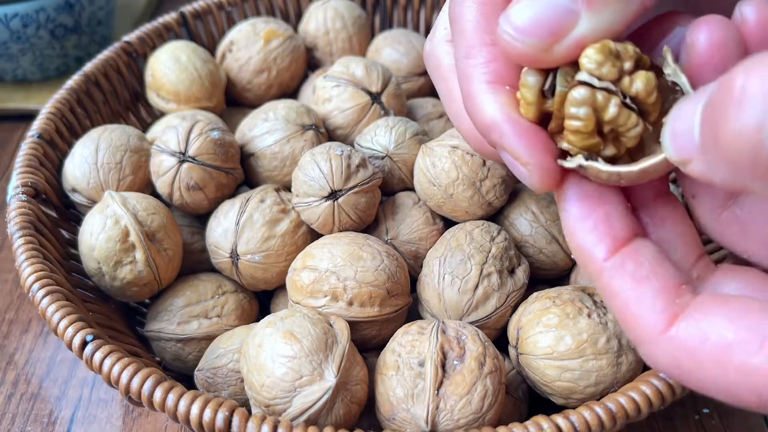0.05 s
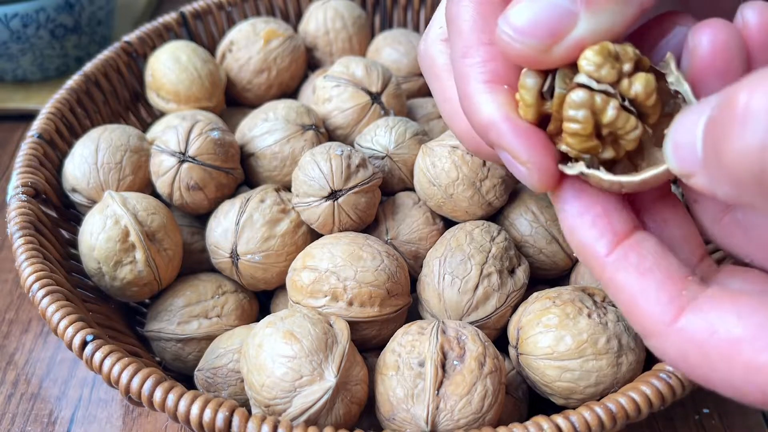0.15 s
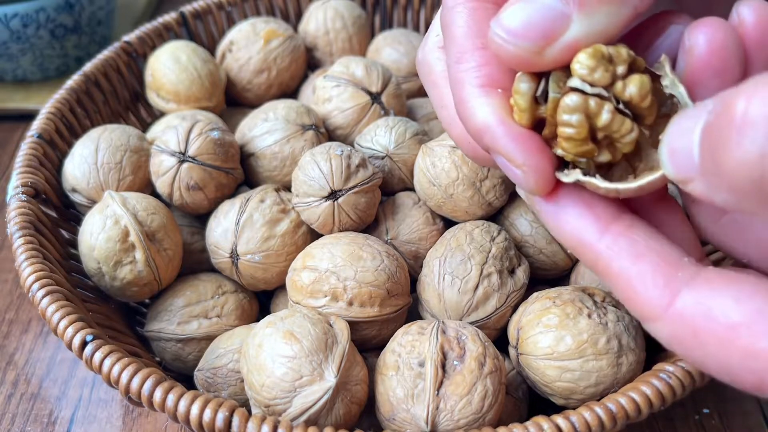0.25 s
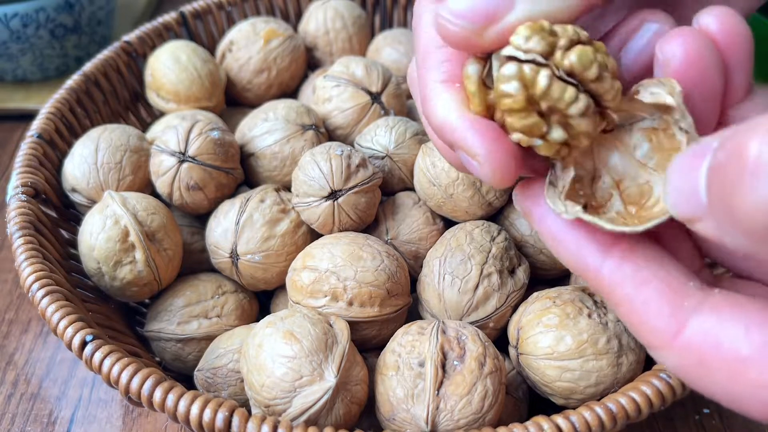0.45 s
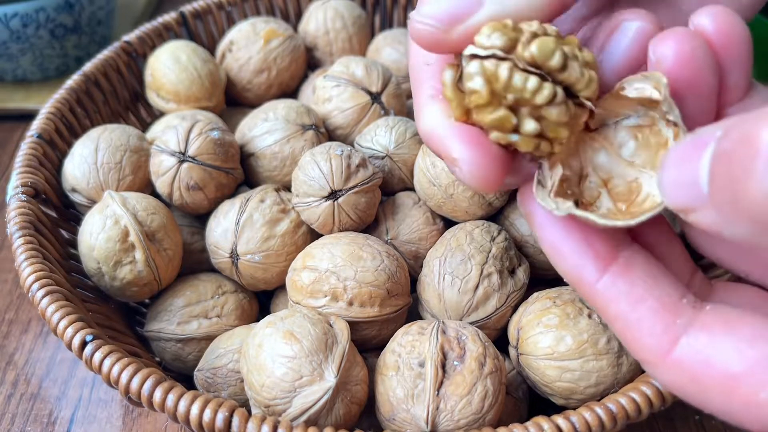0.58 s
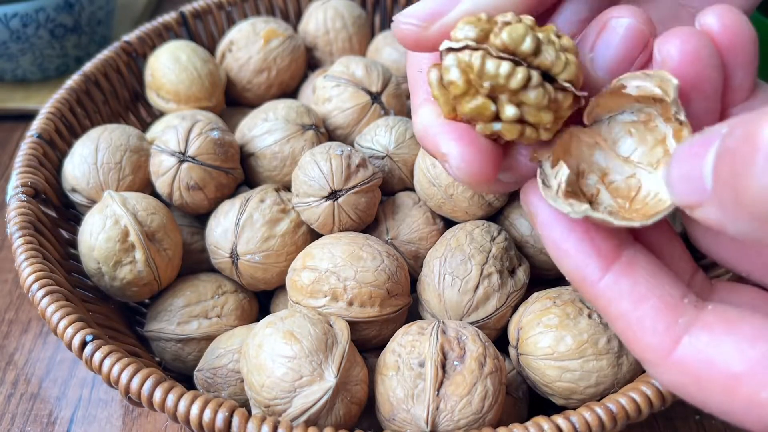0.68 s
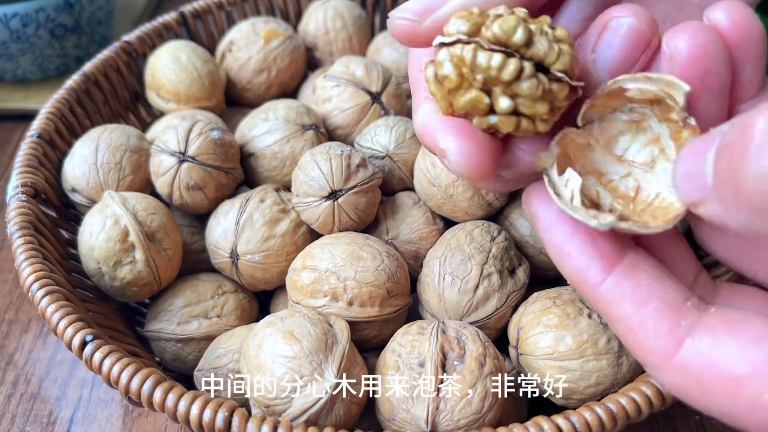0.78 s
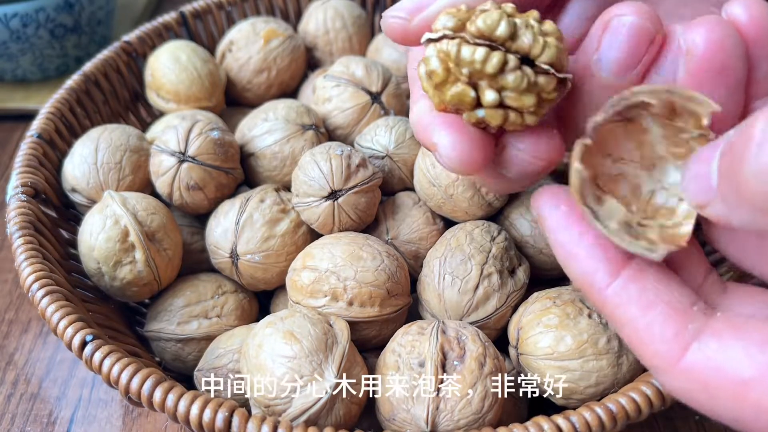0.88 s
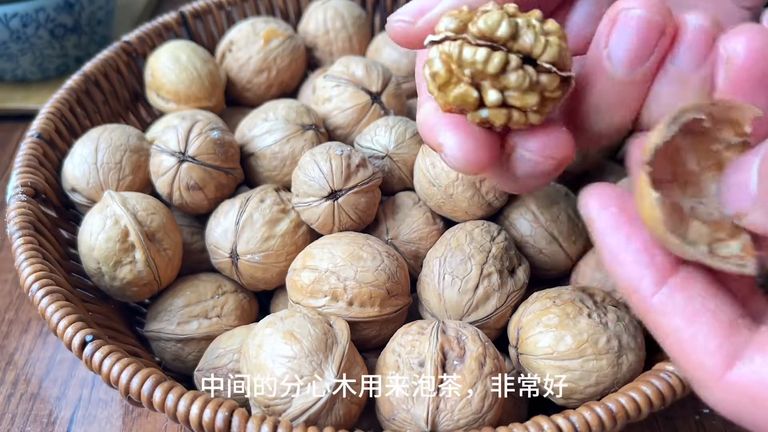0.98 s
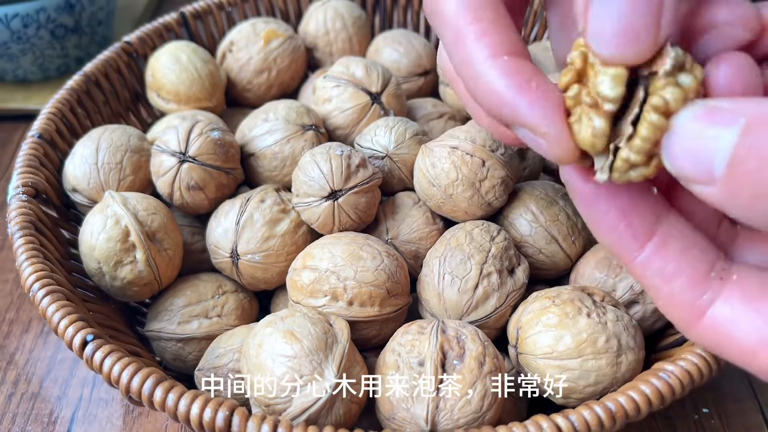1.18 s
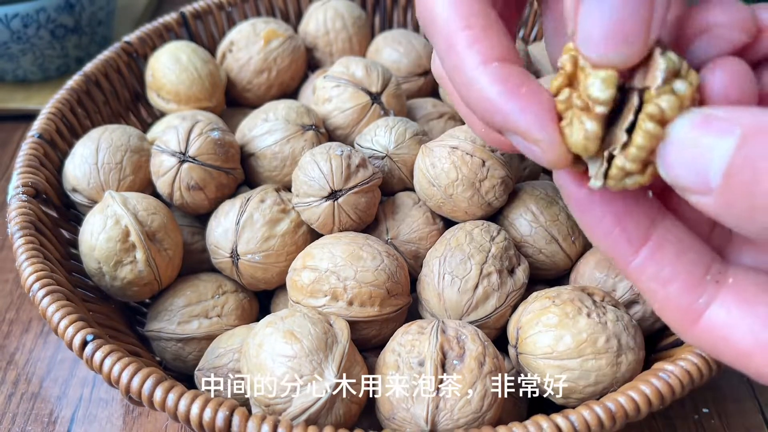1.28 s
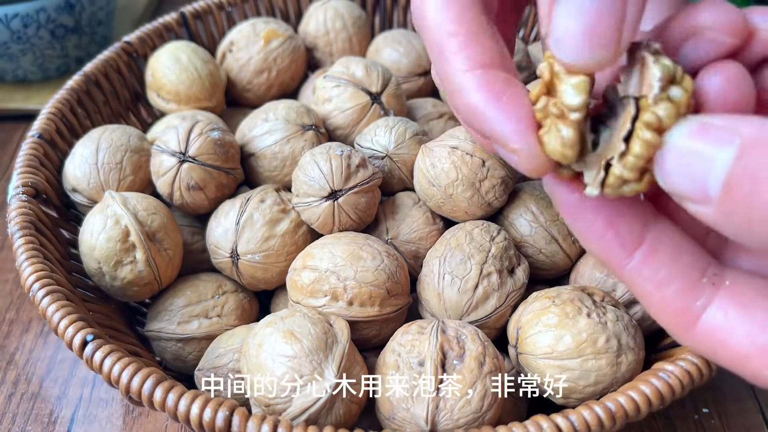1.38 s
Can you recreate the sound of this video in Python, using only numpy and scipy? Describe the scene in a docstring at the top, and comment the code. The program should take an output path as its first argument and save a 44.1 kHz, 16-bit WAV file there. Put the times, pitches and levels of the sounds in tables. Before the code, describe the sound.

A walnut shell cracks sharply as it is pulled apart by hand, with small clicks.

```python
"""A kitchen, phone microphone close to a walnut being prised apart by hand. The seam ticks and creaks, then
gives at 0.22 s with one sharp crack and a second snap. Each break rings the hollow shell; the table and the
room answer. A fingertip slides along the shell, and loose pieces tick against it until 1.1 s. The low room
noise and appliance hum behind them dip near 1.2 s, and a thin, distant whirr comes forward."""
import sys
import numpy as np
from scipy import signal
from scipy.fft import rfft, irfft, next_fast_len
from scipy.io import wavfile
from scipy.ndimage import uniform_filter1d

SR = 44100
rng = np.random.default_rng(int(sys.argv[2]) if len(sys.argv) > 2 else 0)


def master_out(mix):
    """Clip the mix to full scale and print it as 16-bit PCM to the path in sys.argv[1]."""
    frames = np.transpose(np.atleast_2d(mix))
    ceiling = np.clip(frames, -1, 1)
    pcm = np.round(ceiling * 32767).astype(np.int16)
    wavfile.write(sys.argv[1], SR, pcm)


N = 63945

# breaks (peak time [s], level [dB], length [ms], treble tilt [dB/octave], pitch [ratio], splinters [dB])
FRACTURES = [(0.0117, -30.5, 0.84, -1, 1.0, -11), (0.0837, -31, 1.36, -1, 1.054, -10.5),
             (0.086, -42.5, 0.85, 2, 1.02, -10.5), (.0900, -37, 1.2, 7, 1.03, -7),
             (0.0926, -38.5, 1.9, 4, 1.02, -11.5), (0.0968, -39, 1.1, -3, 1.02, -16.5),
             (0.1041, -38, 2.0, -7, 1.03, -13), (.1140, -47, 1.7, -3.5, 0.95, -15),
             (0.1978, -41, .7, 3.5, 1.1, -9), (0.2173, -36.5, 1.1, 1, 1.1, -11),
             (0.2205, -7, 1.0, 2.5, 0.993, -24), (.2250, -20.5, 0.8, -5.5, 1.0, -24),
             (0.2422, -24.5, .8, -5.5, 1.2, -20), (0.244, -17, 0.95, -10.5, 1.02, -15.5),
             (0.2462, -19.5, .6, -10, 0.95, -13.5)]
# modes of the shell held in the fingers (frequency [Hz], gain [dB], length against the break [ratio])
SHELL_MODES = [(1450, -29, 0.92), (2226, -16.5, 0.91), (2850, -11, 1.1), (3360, -2, 1.2),
               (4333, -20.5, 0.8), (4870, -23, 0.77), (5712, -14, .9), (6290, -17, .9), (7250, -18.5, .8),
               (8550, -34.5, 1.4)]
# ring of the shell's hollow (frequency [Hz], gain [dB], t60 [s])
HOLLOW_MODES = [(3260, -29.5, .075), (3546, -17, 0.059), (2850, -38.5, .06), (5340, -41.5, .05),
                (5880, -38.5, .05)]
# loose pieces (start [s], level [dB], time to peak [s], ring [Hz], ring over scrape [dB])
PIECE_TICKS = [(.385, -60.5, 0.0035, 1283, 8.5), (0.4301, -57, 0.0017, 3400, 3),
               (0.8287, -55, 0.0016, 6300, 2), (1.024, -47.5, 0.00079, 4590, 5.5),
               (1.0821, -54, 0.0056, 3347, -5.5), (1.096, -64, 0.0096, 4870, -12),
               (1.118, -69.5, .012, 6270, -10)]
# knocks of hands and nut (start [s], level [dB], pitch [Hz])
KNOCKS = [(.005, -55, 76.5), (.070, -66, 756), (0.08, -56, 55), (.228, -47, 75.2), (0.299, -57, 56),
          (1.064, -55, 86.4)]
# partials of the appliance hum (frequency [Hz], level [dB])
HUM_PARTIALS = [(50.5, -71), (100, -76), (198, -78.5), (255, -77.5), (300, -79.5), (393, -83), (595, -85),
                (1245, -76.5), (1500, -77.5)]

# spectra (frequency [Hz], gain [dB])
SPLINTER_SPECTRUM = [(80, -4), (400, -5), (750, -5), (1000, -6), (1500, -3.5), (2200, 1), (3300, 2.5),
                     (6500, -4), (9000, -18), (10500, -42)]  # spray of splinters
SCRAPE_SPECTRUM = [(300, -2.5), (1500, 2.5), (3300, 6.5), (4700, 2), (6500, 3), (8500, -16), (10000, -32)]  # loose pieces slipping
RUB_SPECTRUM = [(1000, -2.5), (2300, -1), (2800, 1), (3150, -1), (3420, 8.5), (3750, -6), (4200, 1.5),
                (4700, -1.5), (5500, -8), (6400, -9), (7500, -26), (9500, -36)]  # fingers on the shell
SLIDE_SPECTRUM = [(300, -26), (1000, -14), (1260, 2.5), (1400, -2.5), (1750, -16), (3000, -32),
                  (9000, -59.5)]  # fingertip sliding on the shell
ECHO_SPECTRUM = [(200, 3.5), (1200, 10.5), (2100, -3.5), (2600, 2), (3250, -3.5), (3900, 2.5), (4700, 10),
                 (5800, 1.5), (6500, 1), (7500, -3), (9500, -3)]  # reflections
AIR_SPECTRUM = [(25, -3), (60, 8), (110, 5.5), (170, 0.5), (300, 0), (450, -1.5), (620, -0.5), (950, -4),
                (1250, -0.5), (1450, -2.5), (1700, -1), (2050, -9.5), (2500, -19), (4000, -35),
                (9000, -61.5)]  # room noise
WHIRR_SPECTRUM = [(100, -12.5), (300, -0.5), (420, 0), (530, -3), (600, 9.5), (680, -2), (950, -5.5),
                  (1220, -1.5), (1400, -6), (1720, 4), (1950, -6.5), (2300, -16.5), (3000, -32),
                  (4000, -27), (4800, -19.5), (5400, -36), (8000, -57)]  # distant whirr
SIDE_SPECTRUM = [(30, -13.5), (70, -13.5), (130, -8.5), (250, -6), (450, -4), (1000, -8), (2000, -3),
                 (5000, -2)]  # stereo width of room noise and whirr
LEFT_OVER_RIGHT = [(60, 0.7), (250, 0.34), (2800, 1.5), (4500, 2), (9000, 0)]  # balance at the microphone
RUMBLE_SPECTRUM = [(20, -12), (35, -4), (50, 0), (70, -4), (110, -14), (300, -45), (2000, -80)]  # phone

# envelopes (time [s], level [dB])
RUB_ENVELOPE = [(0, -62.5), (.04, -70), (.07, -63), (.13, -71), (.188, -88.5), (.205, -54.5), (.3, -67.5),
                (.48, -68), (.54, -69.5), (.57, -64), (.68, -75.5), (.78, -69), (1.0, -71.5), (1.13, -69),
                (1.19, -95), (1.3, -105), (1.45, -85)]  # fingers
SLIDE_ENVELOPE = [(.35, -99), (.385, -70.5), (.49, -65), (.56, -86), (.62, -101)]  # fingertip slide
AIR_ENVELOPE = [(0, -64), (.17, -64.5), (.33, -61), (.4, -64), (.55, -63), (.69, -64), (.77, -58.5),
                (1.0, -59.5), (1.12, -59.5), (1.172, -62.5), (1.19, -70), (1.215, -70.5), (1.3, -65),
                (1.45, -66.5)]  # room noise
WHIRR_ENVELOPE = [(1.13, -95), (1.2, -81), (1.24, -65), (1.31, -62.5), (1.45, -62)]  # whirr
# rise and fall shared by hum and rumble (time [s], gain [dB])
HUM_ENVELOPE = [(0, -2), (.4, -3.5), (.65, -2.5), (.8, -0.5), (1.03, 2.5), (1.12, -8), (1.19, -21),
                (1.3, -10), (1.45, -13)]

# reflections from close by and from the walls (delay [s], gain [dB], t60 [s])
TABLE_ECHO, ROOM_ECHO = (0.0027, -12.5, .13), (.012, -17, .48)


def shell_breaks(splinter_rise_s=.0013):
    """Close up: each break drives the damped shell modes, leaves the hollow ringing, sheds splinters."""
    out, splinters = np.zeros(N), noise(SPLINTER_SPECTRUM)
    tilt_from_hz = SHELL_MODES[2][0]
    for peak, db, length_ms, tilt_db, pitch, splinter_db in FRACTURES:
        t, length = np.arange(N) / SR - peak, length_ms / 1000
        age = since(peak - length)
        attack = np.minimum(age / length, 1)
        gain = lambda hz, mode_db: undb(db + mode_db + tilt_db * np.log2(max(hz / tilt_from_hz, 1)))
        for hz, mode_db, share in SHELL_MODES:
            out += gain(hz, mode_db) * fracture(t / (length * share)) * np.sin(2 * np.pi * hz * pitch * t)
        for hz, mode_db, t60 in HOLLOW_MODES:
            ring = np.sin(2 * np.pi * (hz * t + rng.random()))
            out += gain(hz, mode_db) * attack * decay(age, t60) * ring
        out += undb(db + splinter_db) * splinters * swell(age / splinter_rise_s)
    return out


def fracture(u, rise_power=1.5, fall_power=3.2):
    """A fracture gathers up to u = 0 and is damped quickly by the fingers."""
    return np.exp(-np.abs(u) ** np.where(u < 0, rise_power, fall_power))


def loose_pieces():
    """Loose pieces catch and slip: brief scrapes, each with the ring of its own piece."""
    out, scrape = np.zeros(N), noise(SCRAPE_SPECTRUM)
    for start, db, rise_s, hz, ring_db in PIECE_TICKS:
        t = since(start)
        ring = undb(ring_db) * np.sin(2 * np.pi * hz * t)
        out += undb(db) * (scrape + ring) * swell(t / rise_s)
    return out


def hand_knocks(rise_s=.016):
    """Dull knocks of the hands and the nut as the shell shifts and lets go."""
    return sum(undb(db) * swell(since(start) / rise_s) * np.sin(2 * np.pi * hz * since(start))
               for start, db, hz in KNOCKS)


def shell_friction(flicker_db=1.5):
    """Fingers rub faintly on the shell, and a fingertip slides along it with a dull scrape."""
    rub = wide(RUB_SPECTRUM, side_db=-4) * curve(RUB_ENVELOPE)
    slide = wide(SLIDE_SPECTRUM, side_db=-9.5) * curve(SLIDE_ENVELOPE)
    return (rub + slide) * undb(flicker_db * wander(120))


def reflections(direct):
    """Quick echoes from the table and basket nearby, then the kitchen's longer tail."""
    response = 0
    for delay, db, t60 in (TABLE_ECHO, ROOM_ECHO):
        t = since(delay)
        fade = (t > 0) * decay(t, t60)
        fade /= np.sqrt(np.sum(fade ** 2))
        response = response + undb(db) * wide(ECHO_SPECTRUM, side_db=-12.5) * fade
    return signal.fftconvolve(direct[None], response, axes=1)[:, :N]


def room_tone(flicker_db=1.0):
    """Dull noise all round the microphone, and a distant whirr that comes forward at the end."""
    spread = lambda spectrum: mid_side(noise(spectrum), colour(noise(spectrum), SIDE_SPECTRUM))
    air = spread(AIR_SPECTRUM) * curve(AIR_ENVELOPE)
    whirr = spread(WHIRR_SPECTRUM) * curve(WHIRR_ENVELOPE)
    return (air + whirr) * undb(flicker_db * wander(30))


def appliance_hum(drift_hz=3.0, waver_db=2):
    """An appliance hums in the background, each partial wavering in level and pitch."""
    hum = np.zeros(N)
    for hz, db in HUM_PARTIALS:
        amplitude = np.sqrt(2) * undb(db + waver_db * wander(13))
        cycles = np.cumsum(hz + drift_hz * wander(14)) / SR
        hum += amplitude * np.sin(2 * np.pi * (cycles + rng.random()))
    return hum * curve(HUM_ENVELOPE)


def handling_rumble(gain_db=-69):
    """Low rumble of the handled phone, rising and falling with the hum."""
    return undb(gain_db) * wide(RUMBLE_SPECTRUM, side_db=-14) * curve(HUM_ENVELOPE)


def undb(db):
    """Decibels to gain."""
    return 10 ** (np.asarray(db) / 20)


def unit(x):
    """Scale to an rms of one."""
    return x / np.sqrt(np.mean(x ** 2))


def curve(envelope):
    """Gain over time from (time [s], level [dB]) points."""
    return undb(np.interp(np.arange(N) / SR, *np.array(envelope).T))


def colour(x, spectrum):
    """Filter by (frequency [Hz], gain [dB]) points."""
    hz, db = np.array(spectrum).T
    size = next_fast_len(N + SR // 10)
    bins_hz = np.maximum(np.fft.rfftfreq(size, 1 / SR), 1)
    gain = undb(np.interp(np.log(bins_hz), np.log(hz), db))
    return irfft(rfft(x, size) * gain, size)[:N]


def noise(spectrum):
    """Coloured noise with an rms of one."""
    return unit(colour(rng.standard_normal(N), spectrum))


def mid_side(mid, side):
    """Left and right from a mid and a side signal."""
    return np.array([mid + side, mid - side])


def wide(spectrum, side_db):
    """Coloured noise that differs partly between left and right."""
    return mid_side(noise(spectrum), undb(side_db) * noise(spectrum))


def wander(rate_hz):
    """Smooth random drift with an rms of one."""
    hold = int(SR / rate_hz)
    steps = np.repeat(rng.standard_normal(N // hold + 1), hold)
    return unit(uniform_filter1d(uniform_filter1d(steps, hold), hold)[:N])


def since(start):
    """Seconds since a moment, zero before it."""
    return np.maximum(np.arange(N) / SR - start, 0)


def swell(u):
    """A rounded burst that peaks at u = 1."""
    return (u * np.exp(1 - u)) ** 2


def decay(t, t60):
    """A fall of 60 dB every t60 seconds."""
    return np.exp(-np.log(1000) * t / t60)


def scene(piece_echo_db=-6.5):
    """The nut close to the microphone and just left of centre, the kitchen around it."""
    cracks, pieces = shell_breaks(), loose_pieces()
    echoes = reflections(cracks + undb(piece_echo_db) * pieces)
    bed = room_tone() + shell_friction() + appliance_hum() + handling_rumble()
    left, right = cracks + pieces + hand_knocks() + echoes + bed
    return np.array([colour(left, [(hz, db / 2) for hz, db in LEFT_OVER_RIGHT]),
                     colour(right, [(hz, -db / 2) for hz, db in LEFT_OVER_RIGHT])])


def record(dry):
    """The phone rounds the loudest peak and cuts the top steeply."""
    ceiling, top_hz = .75, 9450
    lowpass = signal.ellip(8, .2, 70, top_hz, fs=SR, output="sos")
    return signal.sosfilt(lowpass, ceiling * np.tanh(dry / ceiling))


dry = scene()
out = record(dry)
master_out(out)
```